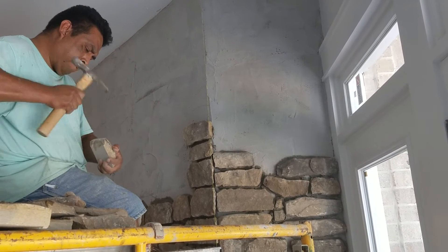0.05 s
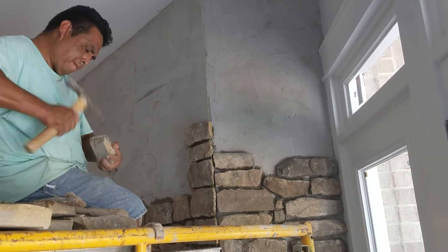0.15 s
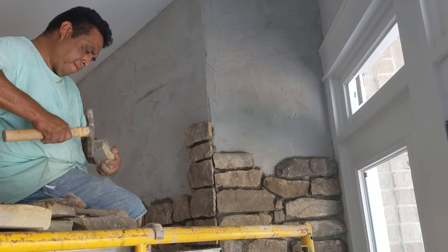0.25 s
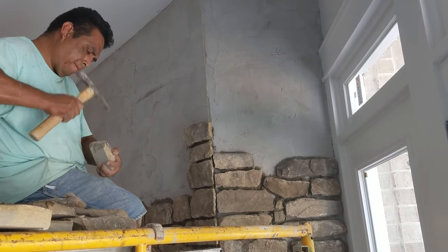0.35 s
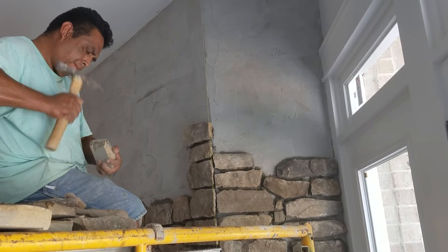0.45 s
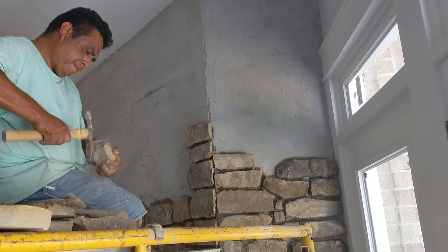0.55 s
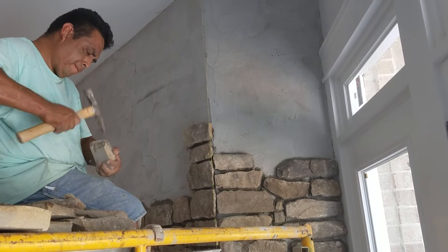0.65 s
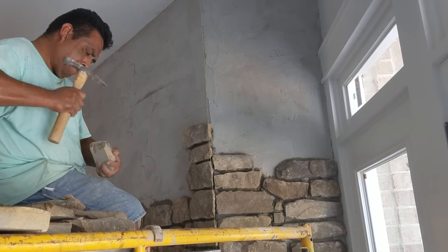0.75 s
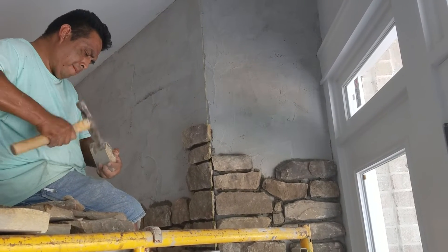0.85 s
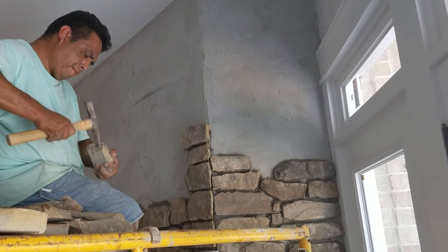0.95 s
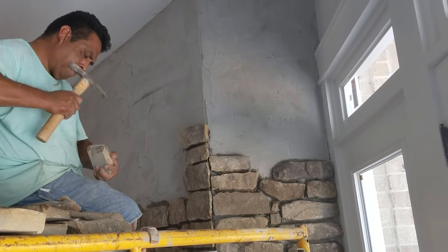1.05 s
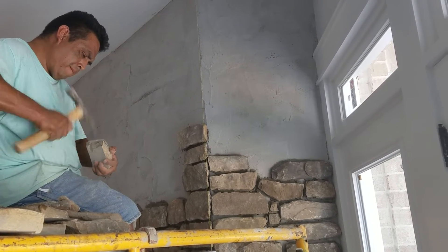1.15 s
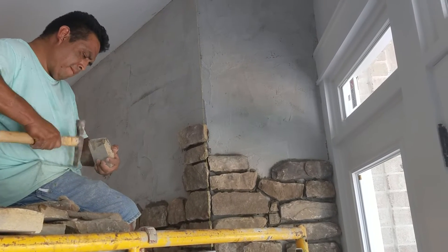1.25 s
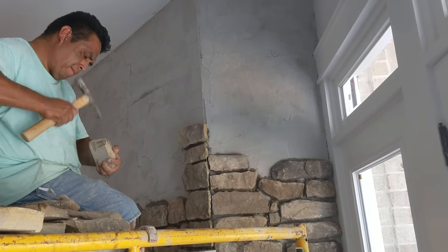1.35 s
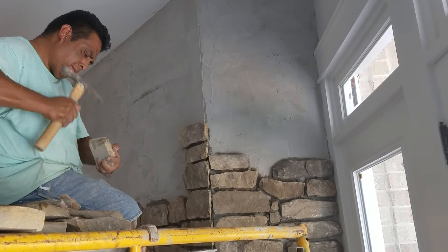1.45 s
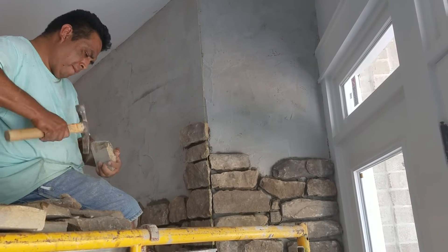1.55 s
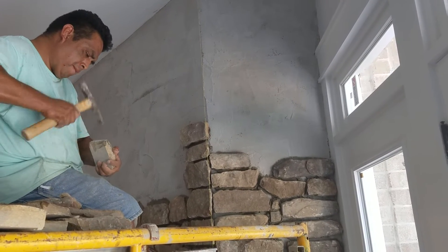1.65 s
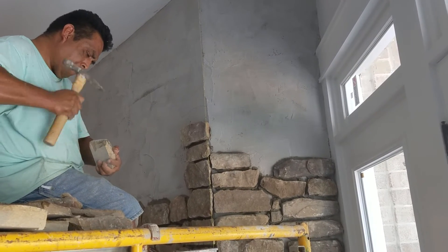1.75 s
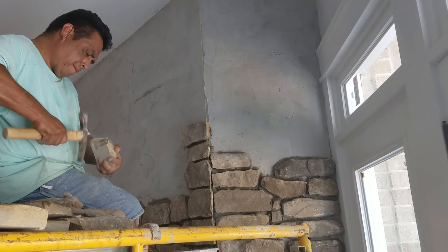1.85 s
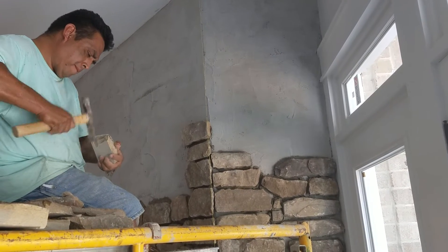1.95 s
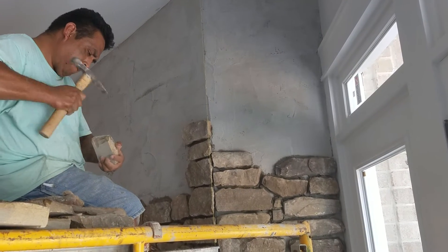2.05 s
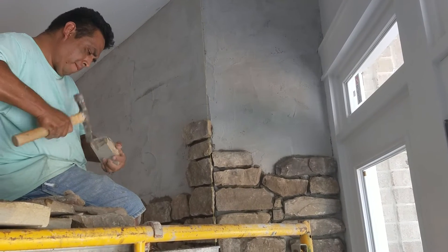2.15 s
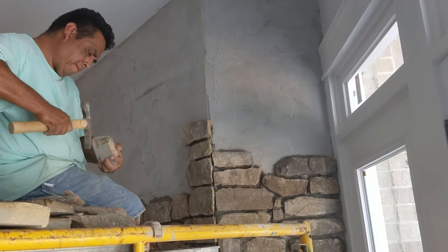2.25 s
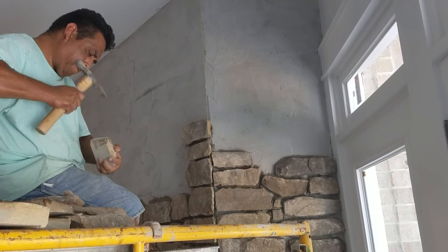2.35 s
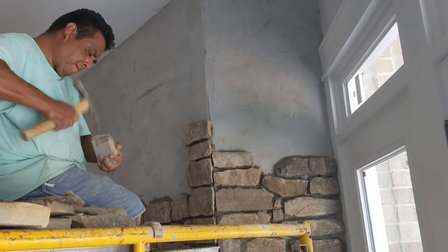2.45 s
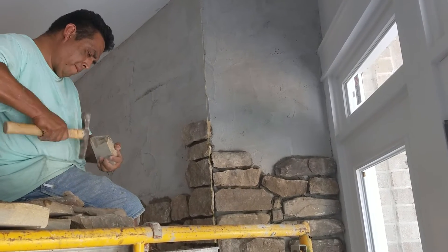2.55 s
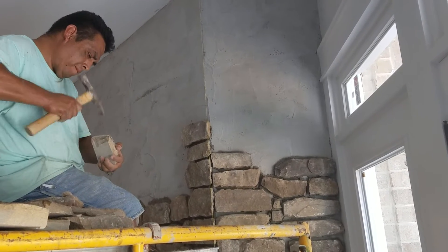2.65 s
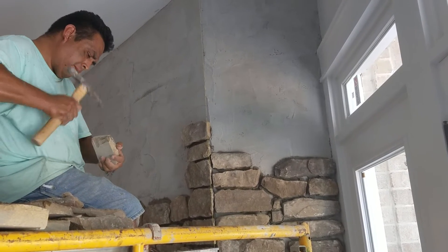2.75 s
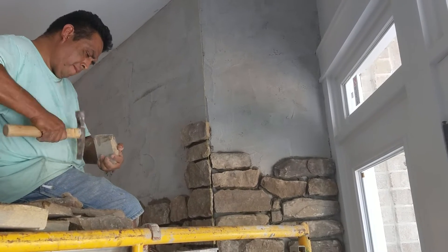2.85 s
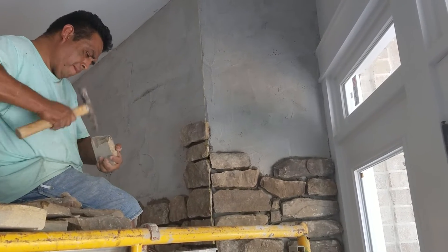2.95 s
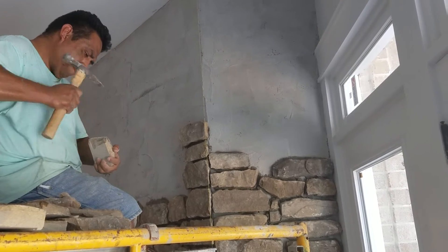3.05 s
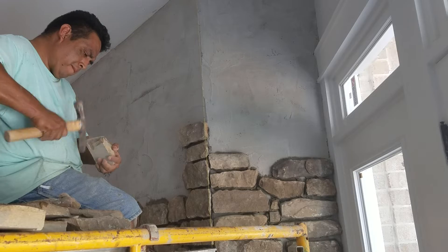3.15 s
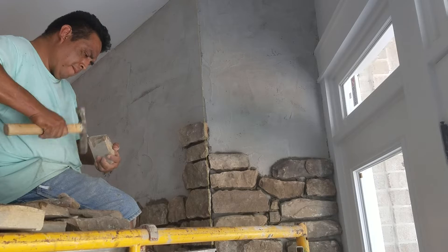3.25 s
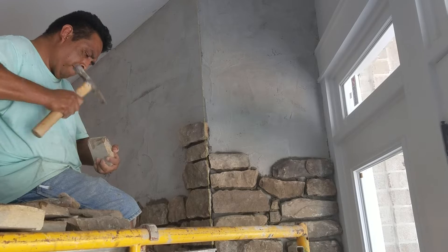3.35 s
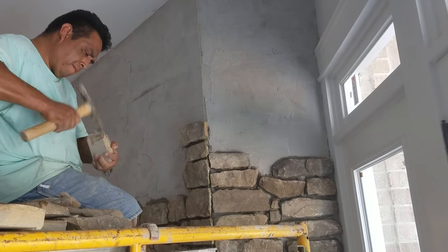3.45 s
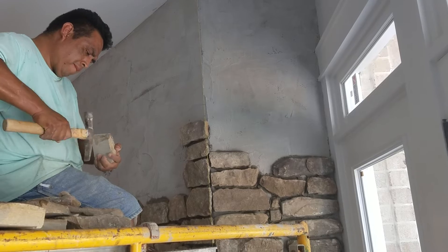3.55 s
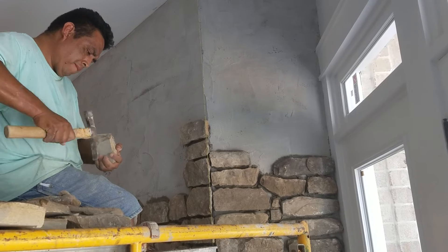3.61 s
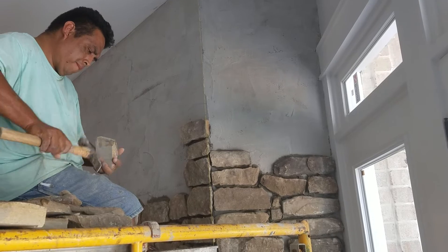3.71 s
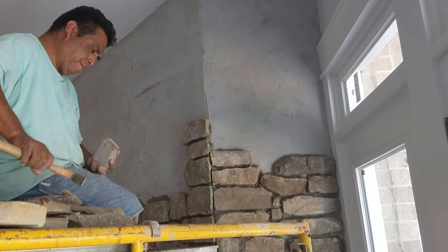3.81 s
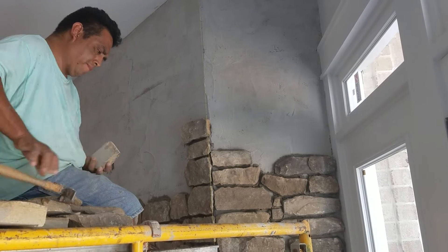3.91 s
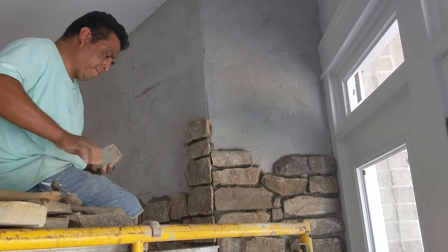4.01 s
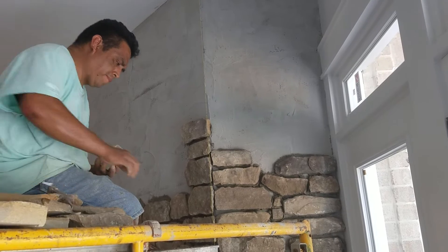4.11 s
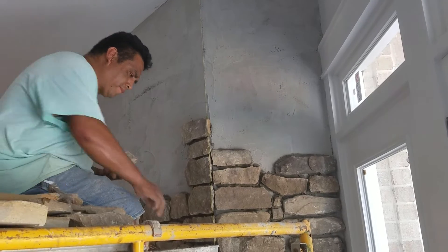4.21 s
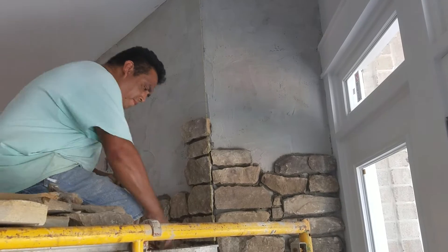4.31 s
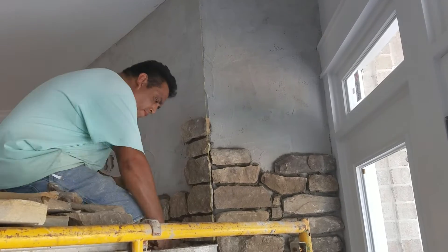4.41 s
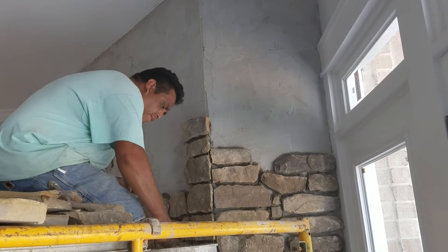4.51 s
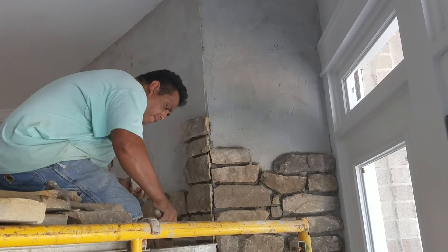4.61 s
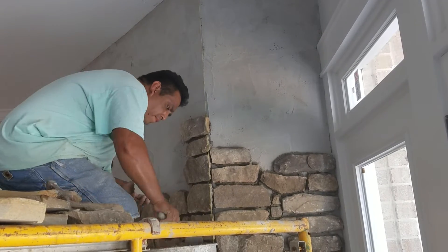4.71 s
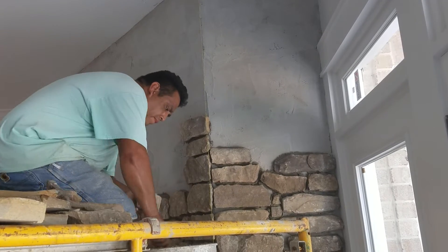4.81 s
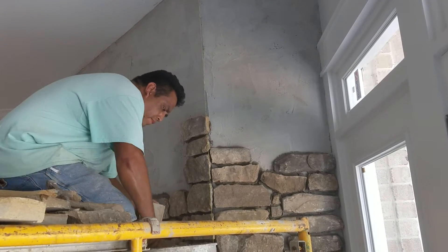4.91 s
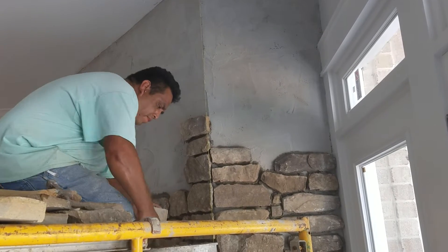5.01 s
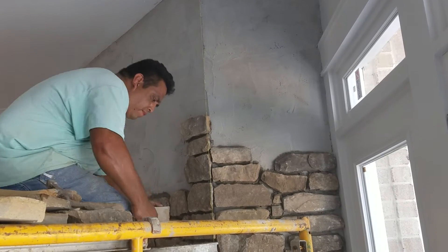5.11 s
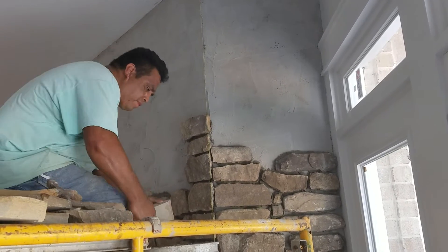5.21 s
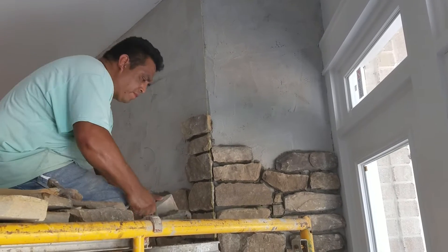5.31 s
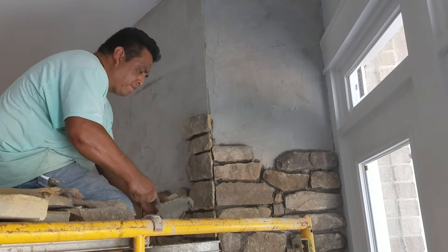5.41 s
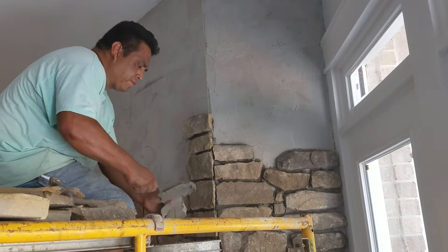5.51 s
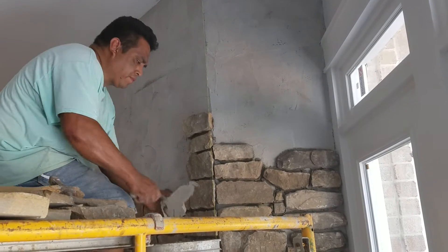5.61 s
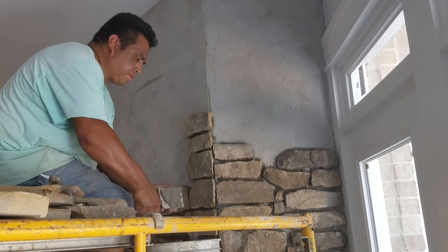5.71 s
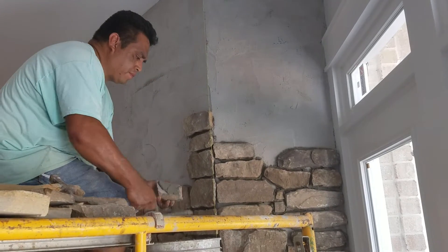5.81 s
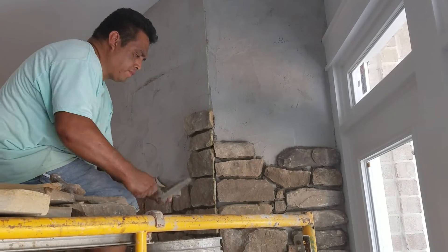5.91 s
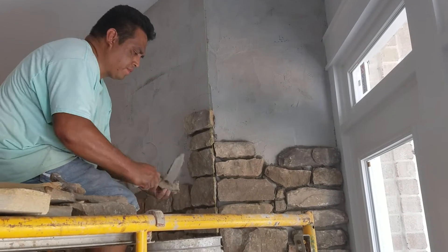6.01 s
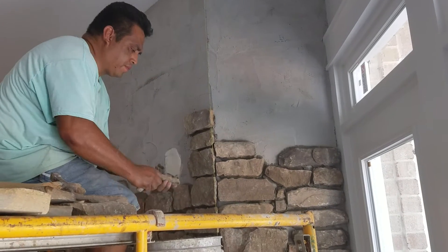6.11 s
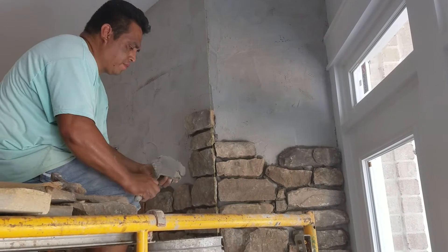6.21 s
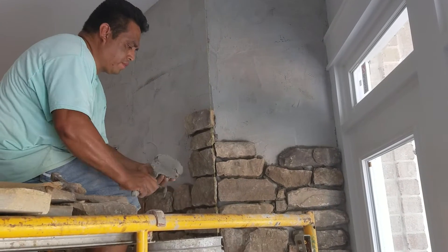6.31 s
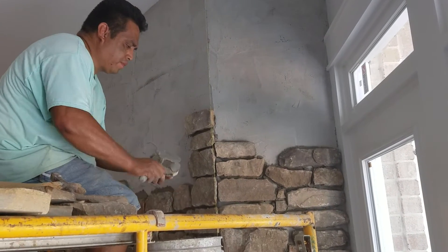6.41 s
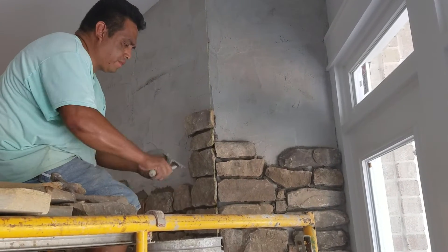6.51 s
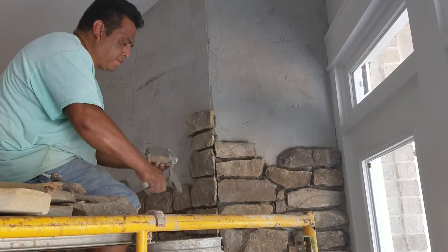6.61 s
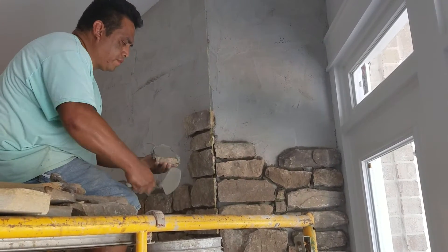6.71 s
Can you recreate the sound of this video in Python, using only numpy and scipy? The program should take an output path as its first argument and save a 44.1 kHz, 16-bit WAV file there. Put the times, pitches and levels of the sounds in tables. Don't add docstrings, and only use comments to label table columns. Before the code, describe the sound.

A phone a few metres off picks up even, hard hammer blows cracking stone, steel head ringing briefly, with loose chips clattering between early hits. After the last blow comes a pause, then a hollow double clunk on wooden boards with steel tinks and low scaffold rumble. Sparse trowel scratches follow, harshest midway, then a few light scrapes and a sharp scratchy tick. The hard room echoes over quiet outdoor rumble and faint machine hum.

```python
import sys
import numpy as np
from scipy import signal
from scipy.fft import rfft, irfft
from scipy.io import wavfile
from scipy.ndimage import uniform_filter1d

SR = 44100
rng = np.random.default_rng(int(sys.argv[2]) if len(sys.argv) > 2 else 0)


def level_to_linear(level):
    exponent = np.asarray(level, float) / 20
    return 10 ** exponent


def transcribe(u):
    v = np.clip(np.atleast_2d(u).T, -1, 1)
    q = np.round(v * 32767).astype(np.int16)
    wavfile.write(sys.argv[1], SR, q)


N = 298116
LEAD = SR // 5

# start in seconds, then levels
# in dB of the crack, the ring of the claw, the ring of the head and the ring of the face.
EARLIER_BLOW = [(-0.13, -13, -18.5, -29.5, -24.5)]
BLOWS = [(0.1814, -6, -29.5, -24, -24.5), (0.51, -6, -28.5, -25, -31), (0.848, -8.5, -33, -15, -21.5),
         (1.1776, -10, -16.5, -21.5, -22), (1.505, -8, -17, -12, -25), (1.8239, -8.5, -14, -11, -29),
         (2.149, -9, -24.5, -16.5, -24), (2.478, -11.5, -33, -26.5, -21.5),
         (2.802, -12.5, -26.5, -19.5, -30.5), (3.1427, -8.5, -33, -17.5, -30),
         (3.4711, -4.5, -27, -26, -22)]
# pitch in Hz, level in dB, time to fall 60 dB in
# seconds, and which level of the blow drives it (0 claw, 1 head, 2 face, 3 crack).
HEAD_MODES = [(2533, 1, 0.09, 0), (3988, 6.5, 0.075, 1), (13110, 12, 0.04, 2), (1530, -31.5, 0.025, 3),
              (2045, -20, 0.062, 3), (2430, -33.5, 0.064, 3), (4700, -15.5, 0.026, 3),
              (5846, -8.5, 0.021, 3), (6800, -11, 0.013, 3), (8000, -17, 0.02, 3), (10320, -11.5, 0.02, 3),
              (14700, -34.5, 0.023, 3)]
# frequency in Hz, level in dB.
CRACK_COLOUR = [(100, -44), (250, -27), (600, -14.5), (1300, -0.5), (2200, -1.5), (3300, -4.5),
                (4800, -7.5), (7000, -13), (9000, -15), (12500, -12.5), (16000, -13.5)]
THUMP_DB = -14


def hammer():
    out = np.zeros(N + LEAD)
    colour = response(CRACK_COLOUR)
    hz, db, t60, driver = np.transpose(HEAD_MODES)
    for s, crack_db, *ring_db in EARLIER_BLOW + BLOWS:
        crack = np.convolve(splinter(t60=0.005), colour)
        add(out, s, level_to_linear(crack_db + 14.5) * crack)
        push = np.abs(splinter(t60=0.0024))
        thump = np.convolve(push, bump(hz=692.0, spread=0.73))
        add(out, s, level_to_linear(crack_db + THUMP_DB) * thump)
        pitch_luck, level_luck = rng.standard_normal((2, len(hz)))
        drive_db = np.take(ring_db + [crack_db], driver.astype(int))
        level = db + drive_db + 2.0 * level_luck - 7.5
        add(out, s, ring(hz * (1 + 0.00062 * pitch_luck), level, t60, seconds=0.4, sway=0.002))
    return out


# start in seconds, level in dB,
# centre in Hz, spread in octaves, time to fall 60 dB in seconds.
KNOCKS = [(.118, -19, 2700, 0.83, 0.0028), (.127, -18, 1640, 0.88, 0.026),
          (.627, -15.5, 2670, 0.56, 0.0076), (.658, -7.5, 1420, 0.72, 0.027),
          (.662, -8.5, 613, 1.03, 0.037), (.69, -19, 2000, 0.78, 0.022), (.716, -13.5, 1300, 0.99, 0.022),
          (2.619, -24.5, 1380, 0.75, 0.0025), (3.07, -41, 6900, 1.2, 0.014),
          (3.846, -34, 6870, 1.1, 0.0064), (3.886, -28.5, 6900, 0.24, 0.011),
          (3.892, -9, 1430, 0.63, 0.025), (4.010, -8, 1470, 0.64, 0.027), (4.032, -12.5, 1780, 0.62, 0.035),
          (4.05, -50, 7440, 0.88, 0.0063), (4.144, -37, 6440, .8, 0.0065), (4.179, -23, 2000, 0.24, 0.0045),
          (4.206, -20, 880, 0.78, 0.0068), (4.39, -45, 2940, 0.73, 0.011)]
TICKS = [(4.455, -41.5, 10300, 0.56, 0.034), (4.583, -25, 6000, 1.7, 0.0075),
         (4.912, -30, 8000, 2.2, 0.025), (4.963, -15, 5040, 3, 0.021), (5.325, -42, 9000, 1.5, .01),
         (5.359, -23, 6000, 2.5, .015), (5.503, -5.5, 13500, 1.6, 0.0082),
         (5.512, -14.5, 12000, 2.6, 0.018), (6.138, -30, 6000, 2.6, .02), (6.308, -18.5, 8000, 2.9, 0.02),
         (6.531, -7.5, 14200, 1.06, 0.023), (6.145, -26, 800, 0.74, .08),
         (6.553, -10.5, 14000, 1.14, 0.0095), (6.566, -13, 14000, .8, 0.0034)]


def knocks(table, gain_db):
    out = np.zeros(N + LEAD)
    for s, db, hz, spread, t60 in table:
        burst = splinter(max(t60, 0.002))
        add(out, s, level_to_linear(db + gain_db) * np.convolve(burst, bump(hz, max(spread, 0.2))))
    return out


# start in seconds, level in dB, loudest region in Hz.
THUDS = [(3.890, -9, 336), (3.924, -13, 480), (4.008, -3.5, 363), (4.053, -13, 310), (4.089, -14, 416),
         (4.112, -14.5, 466), (4.145, -16.5, 305), (4.2, -21.5, 405), (4.249, -24.5, 450),
         (4.464, -25, 160), (4.54, -21.5, 157), (4.958, -23, 1000), (4.989, -40, 400), (5.012, -20.5, 380),
         (5.039, -34, 800), (5.36, -35.5, 416), (5.507, -30.5, 404)]
# pitch in Hz, time to fall 60 dB in seconds.
PLANK_MODES = [(130, 0.063), (188, 0.053), (240, 0.039), (285, 0.056), (366, 0.062), (405, 0.067),
               (474, 0.051), (540, 0.044), (619, 0.054), (705, 0.072), (800, 0.068), (904, 0.083),
               (1080, 0.074)]
# start in seconds, pitch in Hz, level in
# dB, time to fall 60 dB in seconds.
STEEL_TAPS = [
    (3.9, 1840, -22, 0.079),
    (4.012, 2036, -30, 0.088),
    (4.107, 4013, -33.5, 0.096),
    (4.99, 401.5, -31, 0.15),
    (5.36, 406, -41, 0.18),
    (5.505, 391, -42.5, 0.27),
]


def plank():
    out = np.zeros(N + LEAD)
    hz, t60 = np.transpose(PLANK_MODES)
    for s, thud_db, region_hz in THUDS:
        pitch_luck, level_luck = rng.standard_normal((2, len(hz)))
        octaves_away = np.abs(np.log2(hz / region_hz))
        db = thud_db - 9.5 - 9 * octaves_away + 3.25 * level_luck
        add(out, s, ring(hz * (1 + 0.01 * pitch_luck), db, t60, seconds=0.3))
    for s, *mode in STEEL_TAPS:
        tap_hz, tap_db, tap_t60 = np.array(mode)[:, None]
        add(out, s, ring(tap_hz, tap_db, tap_t60, seconds=0.5, sway=0.0016))
    return out


# start in seconds, time to fall 20 dB in seconds,
# hiss level in dB, blade level in dB.
DIGS = [(3.891, 0.0547, -35, -26), (3.91, 0.51, -52, -40.5), (4.008, 0.09, -48, -39), (4.1, 0.05, -47, -50),
        (4.455, -0.5, -54, -53), (4.583, 0, -48.5, -39), (4.81, -2, -51, -58), (4.914, 0.05, -39, -49),
        (4.971, 0.16, -32.5, -31), (5.359, .07, -32.5, -36.5), (5.53, 0.45, -48, -50),
        (6.137, .1, -41, -38), (6.532, -0.04, -46, -26), (6.552, 0.02, -54, -29.5),
        (6.575, 0.05, -41, -47.5)]
# end in seconds, time to swell 20 dB in seconds,
# hiss level in dB, blade level in dB.
DRAGS = [
    (4.972, 0.17, -33.5, -36),
    (5.479, 0.0752, -26, -24.5),
    (5.514, -0.0455, -24, -25),
    (6.262, 0.04, -38, -42.5),
    (6.297, 0.08, -42, -40),
    (6.321, 0.11, -46, -43.5),
]
# frequency in Hz, level in dB.
GRIT_COLOUR = [(3000, -10.5), (6000, -9.5), (8300, -12), (9400, -14.5), (10500, -8), (15000, -6),
               (16500, -9.5)]
# pitch in Hz, width in Hz, level in dB.
BLADE_MODES = [(1000, 990, -1.5), (1810, 540, 1.5), (2440, 130, -7), (3500, 490, -13.5)]
BITE_S, LIFT_S = 0.0026, 0.018


def trowel():
    t = (np.arange(N + LEAD) - LEAD) / SR
    grain_size = level_to_linear(3.2 * rng.exponential(size=N + LEAD))
    grains = unit(rng.standard_normal(N + LEAD) * grain_size)
    sand_colour = response([(100, -72.5)] + GRIT_COLOUR)
    hiss = unit(signal.fftconvolve(grains, sand_colour)[:len(t)])
    blade = resonate(grains, BLADE_MODES)
    strokes = [(s, BITE_S, fall, *db) for s, fall, *db in DIGS]
    strokes += [(s, rise, LIFT_S, *db) for s, rise, *db in DRAGS]
    sand = sum(swell(s, rise, fall, hiss_db - 6.0) for s, rise, fall, hiss_db, _ in strokes)
    steel = sum(swell(s, rise, fall, blade_db - 3.5) for s, rise, fall, _, blade_db in strokes)
    return spread_out(sand, t) * hiss + spread_out(steel, t) * blade


# time in seconds, level in dB.
SHIFTS = [(.13, -44.5), (2.16, -50), (3.895, -31.5), (4.0, -40), (4.07, -33), (4.2, -42), (4.47, -39.5),
          (4.68, -42), (4.96, -39.5), (5.57, -50.5), (5.8, -53), (6.18, -48.5), (6.55, -54)]
# pitch in Hz, width in Hz, level in dB.
FRAME_MODES = [(40, 10, -6), (58, 9.9, 5.5), (86, 30, 3.5), (126, 69, -2), (169, 150, -3.5)]
# pitch in Hz, level in dB.
HUM = [(57, -65.5), (228, -67)]
FRAME_IDLE_DB, JOLT_DB = -60, -45
FRAME_RISE_S, FRAME_FALL_S, JOLT_FALL_S = 0.03, 0.27, 0.24


def scaffold():
    t = np.arange(N) / SR
    shifts = sum(swell(s, FRAME_RISE_S, FRAME_FALL_S, db) ** 2 for s, db in SHIFTS)
    jolts = sum(swell(s, FRAME_RISE_S, JOLT_FALL_S, db + JOLT_DB) ** 2 for s, db, *_ in BLOWS)
    shaking = np.sqrt(level_to_linear(FRAME_IDLE_DB) ** 2 + shifts + jolts)
    rumble = resonate(rng.standard_normal(N), FRAME_MODES) * spread_out(shaking, t)
    hum = sum(level_to_linear(db + 2.5) * np.sin(2 * np.pi * hz * t) for hz, db in HUM)
    return rumble + hum


# frequency in Hz, level
# in dB.
FLOOR_COLOUR = [(88, -13), (150, -5.5), (194, -27), (210, -13), (231, 1.5), (281, -9), (1380, -10),
                (1720, -9.5), (9330, -38.5), (15300, -29), (16500, -36)]
FLOOR_DB = -55


def floor():
    hz, noise = pair(N)
    steps = np.repeat(rng.standard_normal(N // 4000 + 1), 4000)
    drift = uniform_filter1d(steps, 8000)[:N]
    air = unit(irfft(noise * level_to_linear(column(FLOOR_COLOUR, hz, 1)), N))
    return air * level_to_linear(FLOOR_DB + 2.8 * drift)


# frequency in Hz, time to fall 60 dB in seconds, level in dB,
# likeness of left and right (1 is the same, 0 unrelated).
HALL = [(60, 0.91, -12, 0.5), (126, 0.86, -11.5, 0.6), (223, 0.96, 2.5, 0.84), (583, 0.92, 5.5, 0.79),
        (1000, 1, 0.5, .0), (2000, 0.89, 2, 0), (4180, 0.83, 1, 0.15), (8000, 0.8, -4, 0.01),
        (13000, 0.46, 0.5, -.1), (15400, 0.27, -4, -.1)]
# delay in milliseconds, left level in dB, right level in dB.
WALLS = [(2.5, -1.5, -40), (4.6, -4.5, -4), (7.5, -8, -11.5), (10.5, -10.5, -7.5), (13.5, -8, -6)]


def hall(x, wet_db, wall_db, dull_db, pan_db, lag_ms, build_ms):
    size = int(1.3 * SR)
    hz, noise = pair(size)
    noise = noise * level_to_linear(-dull_db * hz / 10000)
    echoes = np.zeros((2, size))
    for k, (_, t60, db, _) in enumerate(HALL):
        share = column([(row[0], j == k) for j, row in enumerate(HALL)], hz, 1)
        echoes += level_to_linear(db) * irfft(noise * share, size) * fade(t60, size / SR)[:size]
    t = np.arange(size) / SR
    build_up = 1 - np.exp(-(1000 * t / build_ms) ** 2)
    echoes *= level_to_linear(wet_db + np.array([[pan_db], [-pan_db]]) / 3) * build_up
    lead = SR // 1000
    half_lag = int(lag_ms * SR / 2000)
    echoes[0, lead + half_lag] += level_to_linear(pan_db / 2)
    echoes[1, lead - half_lag] += level_to_linear(-pan_db / 2)
    near = np.zeros((2, size))
    for ms, *db in WALLS:
        arrival = lead + int(ms * SR / 1000) + rng.integers(-12, 12, size=2)
        near[[0, 1], arrival] += level_to_linear(np.array(db) + wall_db)
    echoes += 1.5 * uniform_filter1d(near, size=2)
    return signal.fftconvolve(x[None], echoes, axes=1)[:, LEAD + lead:][:, :N]


def pair(size):
    hz = np.fft.rfftfreq(size, 1 / SR)
    like = np.clip(column(HALL, hz, 3), -0.99, 0.99)
    mid, side = rfft(rng.standard_normal((2, size)))
    opposite = np.array([[1], [-1]])
    return hz, (np.sqrt(1 + like) * mid + np.sqrt(1 - like) * side * opposite) / np.sqrt(2)


def splinter(t60, size=2048):
    shape = fade(t60, 1.0)[:size] * (1 - fade(t60 / 4, 1.0)[1:size + 1])
    burst = rng.standard_normal(size) * shape
    for _ in range(4):
        bins = rfft(burst)
        even = irfft(bins / np.abs(bins))
        burst = np.sign(even) * shape / 2 + even * np.sqrt(shape)
    return burst / np.sqrt(np.sum(burst ** 2))


def bump(hz, spread):
    octaves = np.linspace(-4, 4, 17)
    db = np.maximum(-6 * (octaves / spread) ** 2, -50)
    return response(np.transpose([hz * 2 ** octaves, db]), size=1024)


def ring(hz, db, t60, seconds, sway=0.):
    t = np.arange(int(seconds * SR)) / SR
    sign = (-1.) ** np.arange(len(hz))
    bend = sway * np.sin(2 * np.pi * 2.86 * t + 2 * np.pi * rng.random())
    phase = 2 * np.pi * hz[:, None] * np.cumsum(1 + bend) / SR
    level = (sign * level_to_linear(db))[:, None] * fade(t60[:, None], seconds)
    return np.sum(level * np.sin(phase), axis=0)


def resonate(x, modes):
    total = 0
    for hz, width, db in modes:
        b, a = signal.iirpeak(hz, hz / width, SR)
        total = total + level_to_linear(db) * signal.lfilter(b, a, x)
    return unit(total)


def response(spectrum, size=512):
    log_gain = column(spectrum, np.fft.rfftfreq(size, 1 / SR), 1) * np.log(10) / 20
    cepstrum = irfft(log_gain)
    cepstrum[1:size // 2] *= 2
    cepstrum[size // 2 + 1:] = 0
    h = irfft(np.exp(rfft(cepstrum)))
    return h / np.sqrt(np.sum(h ** 2))


def swell(s, rise, fall, db):
    t = np.arange(N // 44 + 2) * 44 / SR
    before = (s - t) / max(rise, 1e-3)
    after = (t - s) / max(fall, 1e-3)
    return level_to_linear(np.maximum(db - 20 * np.maximum(before, after), -150))


def spread_out(gain, t):
    return np.interp(t, np.arange(len(gain)) * 44 / SR, gain)


def fade(t60, seconds):
    return np.exp(-np.log(1000) * np.arange(int(seconds * SR)) / SR / np.maximum(t60, 1e-3))


def column(table, hz, k):
    table = np.array(table, float)
    return np.interp(np.log(np.maximum(hz, 1.)), np.log(table[:, 0]), table[:, k])


def unit(x):
    return x / np.sqrt(np.mean(x ** 2))


def add(track, s, sound):
    i = LEAD + int(round(s * SR))
    sound = sound[:len(track) - i]
    track[i:i + len(sound)] += sound


def scene():
    hands = hall(hammer(), wet_db=-29.5, wall_db=-3.5, dull_db=0.5,
                 pan_db=-3.0, lag_ms=-0.3627, build_ms=3.5)
    boards = hall(knocks(KNOCKS, gain_db=15) + plank(), wet_db=-32.5, wall_db=-7.5, dull_db=-1.5,
                  pan_db=-1.0, lag_ms=-0.087, build_ms=1.8)
    strokes = hall(trowel(), wet_db=-37.5, wall_db=-1.0, dull_db=-6.0,
                   pan_db=-3.5, lag_ms=0.3, build_ms=3.0)
    ticks = hall(knocks(TICKS, gain_db=8), wet_db=-36, wall_db=-7.0, dull_db=3.0,
                 pan_db=-4.0, lag_ms=0.3, build_ms=5.0)
    return hands + boards + strokes + ticks + scaffold() + floor()


TOP_BAND_HZ, TOP_LOST_DB = 13700, -27
LOUD_TREBLE_DB = -45


def drop_top_band(x):
    top_filter = signal.butter(N=8, Wn=TOP_BAND_HZ, btype="high", fs=SR, output="sos")
    top = signal.sosfiltfilt(top_filter, x)
    treble_filter = signal.butter(N=4, Wn=3500, btype="high", fs=SR, output="sos")
    treble = signal.sosfilt(treble_filter, x - top)
    top_power, treble_power = [uniform_filter1d(np.mean(v ** 2, axis=0), size=1024) + 1e-14
                               for v in (top, treble)]
    gap_db = 10 * np.log10(top_power / treble_power)
    strong_top = np.clip((gap_db - TOP_LOST_DB) / 2, 0, 1)
    quiet_treble = np.clip((LOUD_TREBLE_DB - 10 * np.log10(treble_power)) / 2, 0, 1)
    keep = np.maximum(strong_top, quiet_treble)
    return x - top * (1 - keep)


def low_pass(x):
    return signal.sosfilt(signal.butter(12, 16980, fs=SR, output="sos"), x)


def record(dry):
    bass_cut = signal.butter(N=2, Wn=33, btype="high", fs=SR, output="sos")
    x = signal.sosfilt(bass_cut, dry)
    rounded = np.tanh(0.92 * x) / 0.7
    top_cut = signal.ellip(8, 0.2, 60, 15800, fs=SR, output="sos")
    x = signal.sosfilt(top_cut, rounded)
    return low_pass(np.clip(drop_top_band(x), -1, 1))


dry = scene()
out = record(dry)
transcribe(out)
```